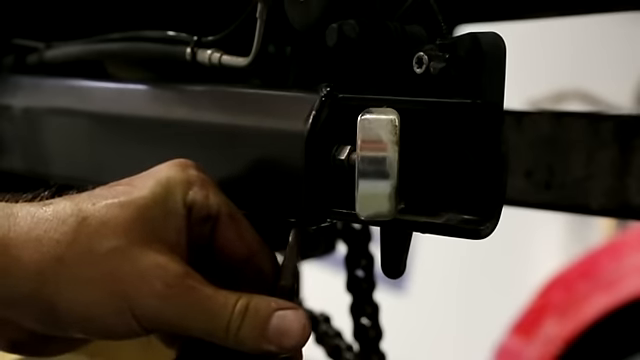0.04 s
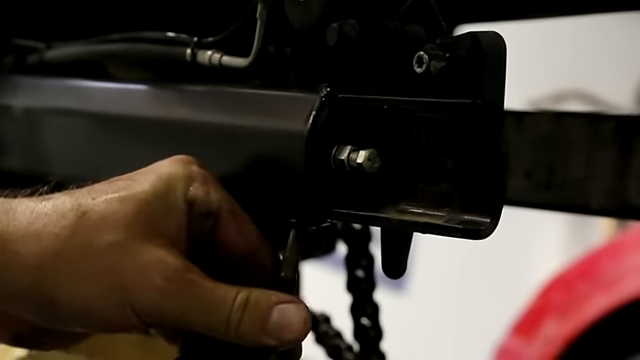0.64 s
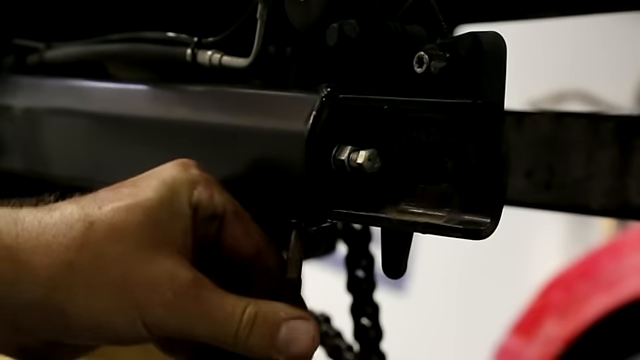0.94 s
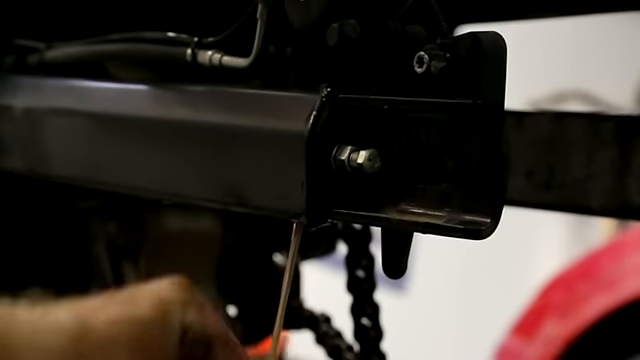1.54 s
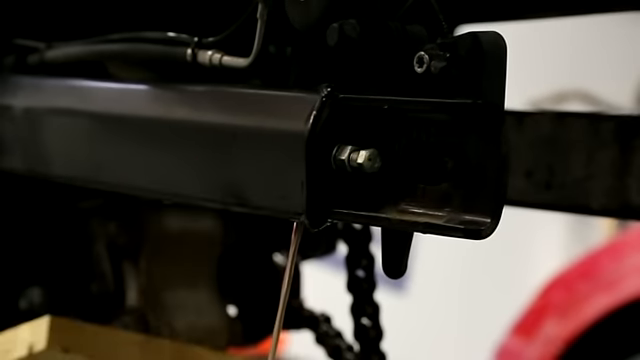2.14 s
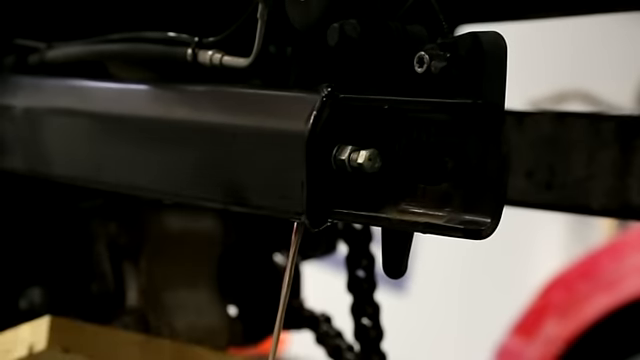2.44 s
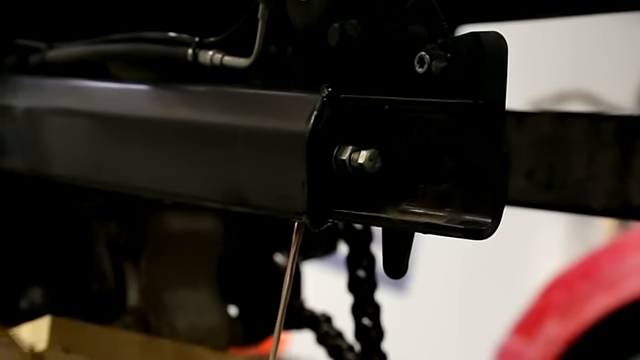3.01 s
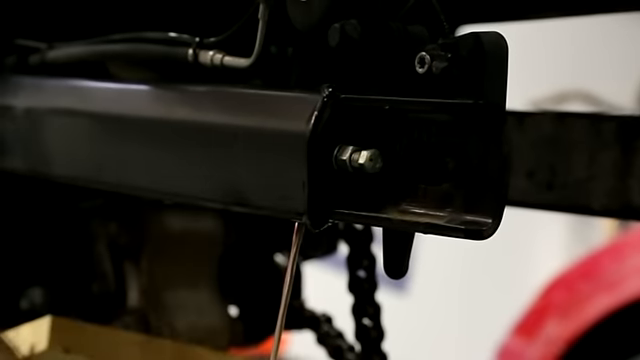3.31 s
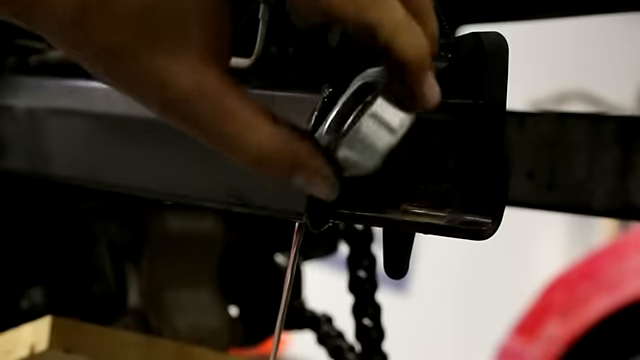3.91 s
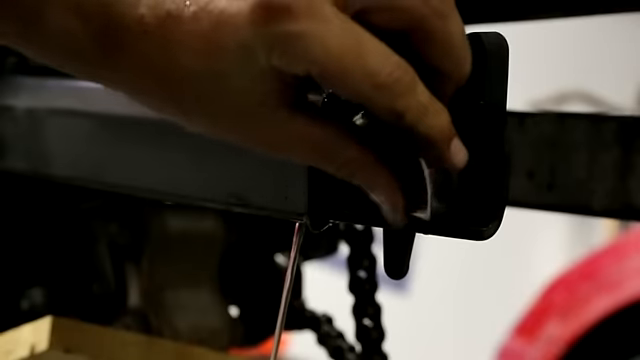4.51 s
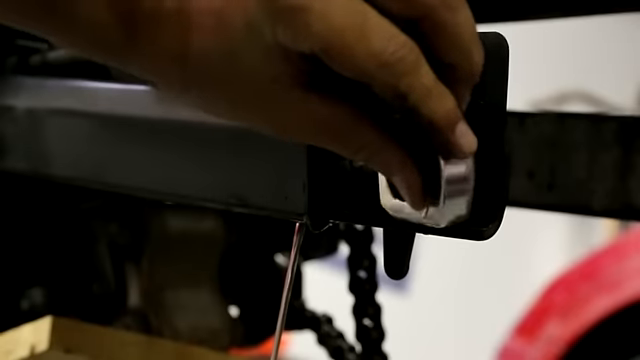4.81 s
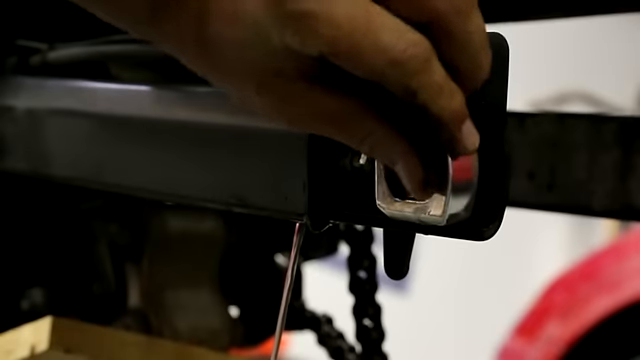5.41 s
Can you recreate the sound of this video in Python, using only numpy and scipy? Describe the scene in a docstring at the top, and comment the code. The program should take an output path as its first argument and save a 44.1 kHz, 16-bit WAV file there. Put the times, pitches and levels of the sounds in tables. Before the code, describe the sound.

Right at the start a hammer cracks against a punch on a hollow steel beam, with a second, louder blow at about 0.4 seconds; the beam and a loose fitting ring briefly. The fitting drops and lands in soft, dull bumps between 0.6 and 1 second. At about 1.3 seconds the punch scrapes out with a light ring. From around 1.5 seconds a thin stream of water begins, and at 1.8 a tool is put down with a loud, hollow metal clunk. The water builds into a steady patter in a shallow puddle, with separate slaps and bubbly plinks, quieter than the metal and continuing to the end at about 5.5 seconds. Between 4.1 and 4.5 seconds the fitting goes back onto its stud in ringing clacks, loudest near 4.25. Everything sounds close, with short workshop reverberation over faint ventilation, hums and a thin high whine.

```python
"""Two hammer blows drive a punch into a hollow steel beam, which rings through a workshop.
A loose fitting rings with it and drops off; the punch scrapes out and a tool is put down.
A thin stream of water builds and patters into a shallow puddle, its drops slapping the surface
and trapping bubbles that plink. The fitting is clacked back onto its stud while the water runs.
Ventilation, hums and a thin whine lie underneath."""
import sys
import numpy as np
from scipy import signal
from scipy.fft import rfft, irfft
from scipy.io import wavfile

SR = 44100
rng = np.random.default_rng(int(sys.argv[2]) if len(sys.argv) > 2 else 0)


def unload_audio(sound):
    """Save the sound as a 16-bit wav file, at the path given as the first command line argument."""
    columns = np.transpose(np.atleast_2d(sound))
    # keep every value between -1 and 1, then stretch to whole-number steps
    steps = np.round(np.clip(columns, -1, 1) * 32767)
    wavfile.write(sys.argv[1], SR, steps.astype(np.int16))


N = 244755
EDGE_HZ = 16100


def amp(db):
    return 10 ** (np.asarray(db) / 20)


def unit_rms(x):
    return x / np.sqrt(np.mean(x ** 2) + 1e-20)


def unit_burst(x):
    """Scales a short sound to the energy of 5 ms at unit level."""
    return x / np.sqrt(np.sum(x ** 2) / (.005 * SR) + 1e-20)


def seconds(length_s):
    return np.arange(int(length_s * SR)) / SR


def curve_at(points, hz):
    point_hz, value = np.transpose(points)
    return np.interp(np.log(hz + 1), np.log(point_hz), value)


def tilt_db(tilt, hz):
    """Gain of a tilt in dB/octave about 3 kHz, flat below 300 Hz."""
    return tilt * np.log2(np.maximum(hz, 300) / 3000)


def add(mix, start_s, sound):
    part = mix[max(round(start_s * SR), 0):][:len(sound)]
    part += sound[:len(part)]


def colour(x, spectrum, tilt=0, size=4096):
    """Minimum-phase filter with the given spectrum and tilt."""
    hz = abs(np.fft.fftfreq(size, 1 / SR))
    log_gain = np.log(amp(curve_at(spectrum, hz) + tilt_db(tilt, hz)))
    response = np.exp(np.conj(signal.hilbert(log_gain)))
    taps = np.fft.ifft(response).real[:size // 2]
    return signal.fftconvolve(x, taps)[:len(x)]


def drift(rate_hz):
    """Slow random wander, unit RMS."""
    low_pass = np.exp(-(np.fft.rfftfreq(N, 1 / SR) / rate_hz) ** 2)
    return unit_rms(irfft(rfft(rng.standard_normal(N)) * low_pass, N))


def dense_modes(t60_s):
    """Many close modes dying together: decaying noise with an even spectrum."""
    t = seconds(.094)
    fade = amp(-60 * t / t60_s)
    x = rng.standard_normal(len(t)) * fade
    for _ in range(3):
        bins = rfft(x)
        x = irfft(bins / (abs(bins) + 1e-12), len(t)) * np.sqrt(fade)
    return unit_burst(x)


def ring(modes, tilt=0, flutter_hz=27, settle_s=.022):
    """Free decay of a struck object; each mode is a close cluster that soon flutters."""
    t = seconds(.6)
    coarse_t = t[::60]
    band = np.exp(-(np.fft.fftfreq(len(coarse_t), coarse_t[1]) / flutter_hz) ** 2)
    steady = np.exp(-coarse_t / settle_s)
    out = np.zeros(len(t))
    for hz, db, t60_s in modes:
        flutter = np.fft.ifft(band * np.exp(2j * np.pi * rng.random(len(coarse_t))))
        flutter /= np.sqrt(np.mean(abs(flutter) ** 2))
        swing = steady + np.sqrt(1 - steady ** 2) * flutter
        envelope = abs(swing) * amp(db + tilt_db(tilt, hz) - 60 * coarse_t / t60_s)
        phase = np.unwrap(np.angle(swing)) + 2 * np.pi * (hz * coarse_t + rng.random())
        out += np.interp(t, coarse_t, envelope) * np.sin(np.interp(t, coarse_t, phase))
    return out


def knocks(contacts, spectrum, t60_s, modes=(), ring_db=0):
    """Each contact is a short coloured crack, plus the ring of any modes given."""
    out = np.zeros(N)
    for start_s, db, tilt in contacts:
        crack = unit_burst(colour(dense_modes(t60_s), spectrum, tilt))
        add(out, start_s, amp(db) * crack)
        if modes:
            add(out, start_s, amp(db + ring_db) * ring(modes, tilt))
    return out


# Workshop reverberation. Each row: frequency in Hz, T60 in seconds, relative level in dB.
ROOM_BANDS = [(130, 0.6, 3.5), (425, 0.78, 8.5), (1040, 0.55, -2), (2500, 0.43, 1), (5500, 0.46, -1),
              (9100, 0.45, -7), (15200, 0.38, -19)]


def room(x, gap_s=.0046, early_db=5.5, early_s=.0092):
    """Scattered reflections, strongest at first, each band dying at its own rate."""
    t = seconds(1)
    taps = rng.standard_normal(len(t)) * (rng.random(len(t)) < .12)
    taps *= np.clip(t / gap_s - 1, 0, 1)
    taps *= amp(early_db * np.exp(-t / early_s))
    hz, frame_s, bins = signal.stft(taps, SR, nperseg=256)
    band_hz, t60_s, db = np.transpose(ROOM_BANDS)
    start_db = curve_at(np.c_[band_hz, db], hz)[:, None]
    decay_db = 60 * frame_s / curve_at(np.c_[band_hz, t60_s], hz)[:, None]
    tail = signal.istft(bins * amp(start_db - decay_db), SR, nperseg=256)[1]
    return signal.fftconvolve(x, tail / np.linalg.norm(tail))[:N]


def wandering_room(x, turn_hz=9, count=3):
    """Splashes land in changing spots, so their reflections crossfade between room responses."""
    angle = 2 * np.pi * turn_hz * np.arange(N) / SR
    fades = (np.sqrt(2 / count) * np.cos(angle + np.pi * k / count) for k in range(count))
    return sum(room(x * fade) for fade in fades)


# Ventilation noise. Each row: frequency in Hz, relative level in dB.
VENT_SPECTRUM = [(25, -25), (60, -11), (90, -7), (112, -3.5), (135, 1), (185, -4.5), (300, -13.5),
                 (480, -11), (1400, -14), (1750, -25), (2350, -19.5), (3500, -26), (7000, -30),
                 (15500, -33)]
# Workshop hums. Each row: frequency in Hz, level in dB, wander rate in Hz.
HUM_TONES = [(86.8, -59, 13), (135.5, -54, 5.2), (466, -67.5, 13), (1320, -64, 85), (2200, -70, 27),
             (2670, -70, 45)]


def workshop(vent_db=-50, whine_db=-59, whine_hz=15681):
    """Ventilation rumble, wavering hums and a thin electronic whine."""
    t = np.arange(N) / SR
    out = amp(vent_db) * unit_rms(colour(rng.standard_normal(N), VENT_SPECTRUM, size=16384))
    for hz, db, wander_hz in HUM_TONES:
        swell = 1 + .35 * drift(wander_hz)
        phase = 2 * np.pi * hz * t + 1.3 * drift(wander_hz)
        out += amp(db) * unit_rms(swell * np.sin(phase))
    return out + amp(whine_db) * unit_rms(np.sin(2 * np.pi * whine_hz * t))


FLOW_START_S, FLOW_BUILD_S = 1.56, .86


def flow(time_s):
    """Share of the full flow reaching the puddle."""
    return 1 - np.exp(-np.maximum(time_s - FLOW_START_S, 0) / FLOW_BUILD_S)


def bubble(hz, decay_cycles=3.8, rise=.09):
    """A trapped bubble rings for a few cycles, rising in pitch as it nears the surface."""
    t = seconds(.02)
    age = hz * t / decay_cycles
    pitch_hz = hz * (1 + rise * (np.minimum(age, 4) - .5))
    envelope = (1 - np.exp(-2 * hz * t)) * np.exp(-age)
    return unit_burst(envelope * np.sin(2 * np.pi * np.cumsum(pitch_hz) / SR))


def slap(spatter_s=.0024):
    """A drop's impact: one sharp pulse and a brief spatter."""
    t = seconds(.02)
    x = .36 * rng.standard_normal(len(t)) * np.exp(-t / spatter_s)
    x[0] += 1
    return x


def patter(per_s, spread_db, bubble_gain, kinds=28):
    """A random shower of small drops of many sizes, one bubble pitch per kind."""
    out = np.zeros(N)
    odds = per_s / kinds / SR
    for hz in np.geomspace(2000, 13000, kinds):
        grain = unit_burst(slap()) + bubble_gain * bubble(hz)
        chance = rng.random(N)
        for sample in np.flatnonzero(chance < odds):
            size = min(-np.log(chance[sample] / odds), 3)
            add(out, sample / SR, amp(spread_db * size) * grain)
    return unit_rms(out)


# Fine spray. Each row: frequency in Hz, relative level in dB.
SPRAY_SPECTRUM = [(300, -14), (900, 3), (1700, -8), (2300, -15), (3800, -3.5), (5000, -3.5), (7000, 7.5),
                  (9200, 5.5), (11000, 4), (15500, 2)]
# Its spurts. Each row: time in seconds, level in dB.
SPRAY_SPURTS = [(1.5, -88), (1.72, -66), (1.83, -43), (1.97, -61.5), (2.4, -52), (3.0, -53.5), (3.3, -60),
                (3.39, -44), (4.2, -55.5), (5.55, -49.5)]


def spray(flicker_db=2):
    """Tiny droplets come in spurts as the stream breaks up unevenly."""
    droplets = unit_rms(colour(patter(per_s=160, spread_db=3.5, bubble_gain=.66), SPRAY_SPECTRUM))
    spurt_db = np.interp(np.arange(N) / SR, *np.transpose(SPRAY_SPURTS))
    return droplets * amp(spurt_db + flicker_db * drift(rate_hz=32))


# Drumming on the puddle. Each row: frequency in Hz, relative level in dB.
DRUMMING_SPECTRUM = [(200, -29), (430, -3.5), (620, -18.5), (800, -4.5), (1020, 1.5), (1200, -9),
                     (1400, -7), (1700, -14), (2300, -15.5), (4000, -21), (9000, -21.5)]


def drumming(full_flow_db=-52.5):
    """Dense impacts without bubbles, swelling with the flow."""
    impacts = unit_rms(colour(patter(per_s=460, spread_db=8, bubble_gain=0), DRUMMING_SPECTRUM))
    return impacts * amp(full_flow_db) * flow(np.arange(N) / SR) ** .2


# One splash. Each row: frequency in Hz, relative level in dB.
SPLASH_SPECTRUM = [(200, -42), (550, -23), (800, -5.5), (1050, 2), (1400, 4), (1750, -4), (2300, 3),
                   (5000, 1.5), (9000, 4), (14000, -2.5), (16000, -5.5)]


def drop(splash_db, tilt, bubble_hz, bubble_db, droplets=3, max_flight_s=.033):
    """A drop slaps the puddle, traps a bubble and throws up droplets that do the same on landing."""
    out = np.zeros(int(.1 * SR))
    splash = unit_burst(colour(slap(), SPLASH_SPECTRUM, tilt, size=1024))
    add(out, 0, amp(splash_db) * splash + amp(bubble_db) * bubble(bubble_hz))
    for flight, pitch in rng.uniform(.15, 1, (droplets, 2)):
        splash = amp(splash_db - 9) * unit_burst(colour(slap(), SPLASH_SPECTRUM, tilt + 3, size=1024))
        plink = amp(bubble_db - 12) * bubble(bubble_hz * 2 ** (.6 * (pitch - .5)))
        add(out, flight * max_flight_s, (splash + plink) / droplets ** .5)
    return out


def drips(count=130, first_per_s=14, gain_per_s2=3.6, first_hz=11400, full_hz=3365):
    """Lesser drops at a loose, quickening beat; more flow makes them louder, with larger bubbles."""
    out = np.zeros(N)
    age_s = seconds(8)
    fallen = first_per_s * age_s + gain_per_s2 * age_s ** 2 / 2
    starts_s = FLOW_START_S + np.interp(np.arange(count) + rng.random(count), fallen, age_s)
    scatter = np.clip(rng.standard_normal((count, 4)), -2, 2)
    for start_s, (splash, tilt, pitch, plink) in zip(starts_s, scatter):
        share = flow(start_s)
        hz = first_hz * (full_hz / first_hz) ** share * 2 ** (.44 * pitch)
        drip = drop(splash_db=-40 + 2.5 * splash, tilt=-1.6 + 2.5 * tilt,
                    bubble_hz=min(hz, EDGE_HZ), bubble_db=-43 + plink)
        add(out, start_s, share * drip)
    return out


# Large drops. Each row: start in seconds, splash level in dB, splash tilt in dB/octave,
# bubble pitch in Hz, bubble level in dB before the boost.
LARGE_DROPS = [(1.511, -54, 2, 6900, -49.5), (2.032, -57, -1, 6800, -43.5), (2.0918, -33.5, 4.5, 7360, -37),
               (2.1474, -34.5, -1.5, 3200, -45), (2.276, -38, -0.5, 6430, -38), (2.3, -36, 0, 1510, -58),
               (2.3615, -35.5, -4, 2290, -29.5), (2.635, -43, 7, 6940, -42), (2.739, -36.5, 2, 4160, -49),
               (2.7978, -31.5, -0.5, 3930, -36.5), (2.9311, -42, 1, 3700, -38.5),
               (2.9974, -36.5, -4, 2490, -33.5), (3.106, -28.5, 9.5, 11760, -53),
               (3.3448, -35, -2.5, 4050, -52), (3.5696, -34.5, -1.5, 2880, -40.5),
               (3.6462, -33.5, -3.5, 3960, -55), (3.7567, -33, -4, 2780, -34.5),
               (3.9343, -33.5, -5, 2350, -34), (4.4034, -31, 2.5, 3640, -38.5),
               (4.4372, -34, 2, 6900, -33.5), (4.5048, -34.5, 0.5, 3860, -36),
               (4.5309, -37.5, 2, 2920, -34.5), (4.6215, -42, -4, 3930, -39),
               (4.7075, -27.5, 10.5, 11670, -45), (4.7303, -31, 1, 6870, -32.5),
               (4.77, -33, -5.5, 3520, -37), (4.8945, -30.5, 11.5, 9350, -52),
               (4.9824, -30.5, 0, 6740, -43), (5.0979, -34.5, -6.5, 3940, -38),
               (5.1658, -38, -8.5, 2130, -43.5), (5.237, -35, 0, 4100, -40)]


def large_drops(bubble_boost_db=2):
    """Single drops that stand out of the stream."""
    out = np.zeros(N)
    for start_s, splash_db, tilt, bubble_hz, bubble_db in LARGE_DROPS:
        add(out, start_s, drop(splash_db, tilt, bubble_hz, bubble_db + bubble_boost_db))
    return out


# Floor and bench echoes. Each row: delay in seconds, gain in dB.
NEAR_ECHOES = [(.0035, -8), (.0128, -16), (.0203, -15)]
# Basin under the puddle. Each row: frequency in Hz, relative level in dB, T60 in seconds.
BASIN_MODES = [(1030, -41, .25), (3100, -51, .1), (3930, -33, .11), (4100, -46, .1)]


def water(basin_db=-18):
    """The stream lands, echoes off nearby surfaces and faintly rings the basin."""
    direct = spray() + drumming() + large_drops() + drips()
    out = direct.copy()
    for delay_s, db in NEAR_ECHOES:
        add(out, delay_s, amp(db) * direct)
    return out + amp(basin_db) * signal.fftconvolve(out, ring(BASIN_MODES))[:N]


# Fitting landing. Each row: start in seconds, level in dB, tilt in dB/octave.
BUMP_CONTACTS = [(.334, -49, -6), (.6378, -29, 1.5), (.6425, -29, -4.5), (.851, -37.5, 0.5),
                 (.977, -44, -0.5)]
# One bump. Each row: frequency in Hz, relative level in dB.
BUMP_SPECTRUM = [(50, -23), (130, 4), (300, -2.5), (550, -9.5), (850, 0), (1300, -15.5), (1850, -10),
                 (2700, -28), (6000, -25.5), (15000, -36)]


def fitting_fall():
    """The loose fitting lands in dull bumps."""
    return knocks(BUMP_CONTACTS, BUMP_SPECTRUM, t60_s=.094)


# Punch against the hole. Each row: start in seconds, level in dB, tilt in dB/octave.
SCRAPE_CONTACTS = [(1.274, -50.5, -0.5), (1.349, -33, 1.5), (1.3525, -36, 4), (1.356, -34.5, -2.5),
                   (1.3595, -36.5, 3), (1.363, -34.5, -6), (1.441, -46, -5)]
# One scrape. Each row: frequency in Hz, relative level in dB.
SCRAPE_SPECTRUM = [(200, -27), (700, -15), (1000, 0.5), (1420, 1), (1900, -5), (2500, -1), (3300, -5),
                   (5000, -1.5), (8000, -12.5), (10300, -14), (11600, 1.5), (12800, -28), (16000, -20)]
# Punch ring. Each row: frequency in Hz, relative level in dB, T60 in seconds.
PUNCH_MODES = [(1400, -14.5, 0.32), (2450, -18, 0.26), (4950, -30, .22), (11500, -22, .16)]


def punch_pull():
    """The punch scrapes out of the hole, ringing at each contact."""
    return knocks(SCRAPE_CONTACTS, SCRAPE_SPECTRUM, t60_s=.096, modes=PUNCH_MODES)


# Knocks on the frame. Each row: start in seconds, level in dB, tilt in dB/octave.
CLUNK_CONTACTS = [(1.804, -15.5, -0.7), (1.8085, -13, -.5), (1.8974, -34.5, 8.5), (4.076, -22, 1)]
# One clunk. Each row: frequency in Hz, relative level in dB.
CLUNK_SPECTRUM = [(50, -35), (120, -8), (270, -18), (450, -10.5), (650, -14), (950, 4), (1250, -3),
                  (1650, 6.5), (2100, -10), (2900, -7), (4500, -15), (7500, -27), (15000, -43)]
# Frame ring. Each row: frequency in Hz, relative level in dB, T60 in seconds.
FRAME_MODES = [(877, -19, .42), (910, -22, .4), (1300, -21, .35), (1440, -15, .08), (1631, -20, .44),
               (1665, -11, .045), (1707, -19.5, .44), (2340, -27, .22), (2810, -27, .28), (3550, -37, .38),
               (5535, -36, .13)]


def frame_clunks():
    """The frame rings hollow under a tool put down, and later under the fitting."""
    return knocks(CLUNK_CONTACTS, CLUNK_SPECTRUM, t60_s=.12, modes=FRAME_MODES, ring_db=1)


# Fitting against its stud. Each row: start in seconds, level in dB, tilt in dB/octave.
CLACK_CONTACTS = [(4.072, -28, -4), (4.1692, -25, 5.5), (4.183, -31, 5), (4.199, -28.5, 5.5),
                  (4.2502, -12, 3.5), (4.253, -18.5, -2), (4.276, -30, -2), (4.466, -31.5, -3.5)]
# One clack. Each row: frequency in Hz, relative level in dB.
CLACK_SPECTRUM = [(100, -44), (300, -26.5), (620, -13.5), (860, 8), (1100, -20), (1500, 2.5), (1850, 4.5),
                  (2300, -0.5), (3100, 2.5), (4700, -3), (6000, -10), (8900, -8.5), (11000, -23),
                  (16000, -30)]
# Ring of fitting on stud. Each row: frequency in Hz, relative level in dB, T60 in seconds.
STUD_MODES = [(864, -12.5, 0.092), (915, -28, 0.68), (1006, -9, 0.14), (1320, -8.5, 0.12),
              (1900, -25, 0.31), (2444, -20.5, 0.44), (4130, -29, 0.14), (4930, -23, 0.19),
              (7700, -47, 0.15), (8690, -30, 0.28), (14560, -37, .08)]


def stud_clacks():
    """The fitting goes back onto its stud in a run of ringing clacks."""
    return knocks(CLACK_CONTACTS, CLACK_SPECTRUM, t60_s=.063, modes=STUD_MODES, ring_db=-1.5)


# Contacts of the two blows. Each row: start in seconds, level in dB, crack tilt in dB/octave,
# beam ring gain in dB, fitting ring gain in dB.
BLOW_CONTACTS = [(.0023, -14, -2.3, -6, 3.5), (.0095, -16, -2.5, -4, -7), (.025, -23.5, -5.5, -14, -13),
                 (0.3582, -8.5, -2.5, 4.5, -15)]
# One crack. Each row: frequency in Hz, relative level in dB.
CRACK_SPECTRUM = [(40, -37), (135, -18), (300, -18.5), (600, -12), (900, -3.5), (1300, -1), (1900, -5.5),
                  (2600, -1), (4200, -2), (5800, 4.5), (8600, 4.5), (10000, -1.5), (13000, 2.5),
                  (16000, -15)]
# Beam and loose fitting rings. Each row: frequency in Hz, relative level in dB, T60 in seconds.
BEAM_MODES = [(431, -30, .42), (770, -32, .45), (860, -20, .1), (1044, -29, .65), (1110, -18, .1),
              (1357, -27, .5), (1860, -33, .45), (2442, -30, .4), (3400, -34, .5), (4790, -33, .4),
              (5530, -24, .42), (6130, -34, .45), (6450, -33, .45), (7615, -33, .35), (8730, -26, .33),
              (14530, -44, .65)]
FITTING_MODES = [(748, -23.5, 0.3), (1386, -17.5, 0.28), (2410, -13.5, 0.31), (2500, -13, 0.23),
                 (2570, -14.5, 0.29), (2930, -20.5, .32), (3035, -16, 0.13), (4040, -22, .18),
                 (4530, -12.5, 0.14), (5540, -16, .32), (6800, -32, 0.14), (10270, -20, 0.26),
                 (10400, -21, .28)]


def hammer():
    """The punch cracks against the beam; beam and loose fitting ring on."""
    out = knocks([row[:3] for row in BLOW_CONTACTS], CRACK_SPECTRUM, t60_s=.068)
    for start_s, db, _, beam_db, fitting_db in BLOW_CONTACTS:
        add(out, start_s, amp(db + beam_db) * ring(BEAM_MODES))
        add(out, start_s, amp(db + fitting_db) * ring(FITTING_MODES))
    return out


def scene():
    """Water and metal, direct and through the room, over the workshop's background; mono."""
    metal = [(hammer(), -9), (fitting_fall(), -13), (punch_pull(), -12),
             (frame_clunks(), -10), (stud_clacks(), -9)]
    stream = water()
    out = stream + amp(-9) * wandering_room(stream) + workshop()
    for direct, reverb_db in metal:
        out += direct + amp(reverb_db) * room(direct)
    return out[None]


def record(dry):
    """Clips peaks at full scale, then low-passes at EDGE_HZ."""
    low_pass = signal.firwin(301, EDGE_HZ, window=("kaiser", 8), fs=SR)
    return signal.oaconvolve(np.clip(dry, -1, 1), low_pass[None], "same")


dry = scene()
out = record(dry)
unload_audio(out)
```